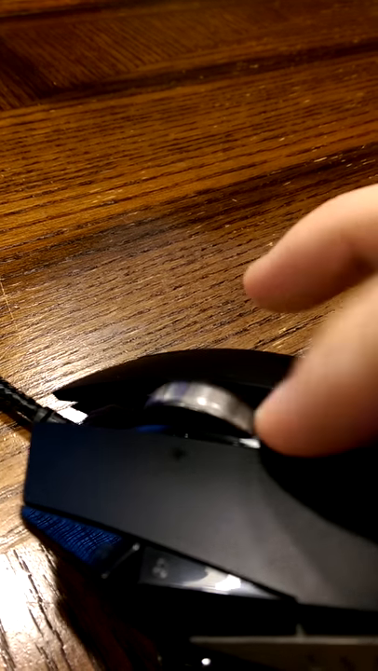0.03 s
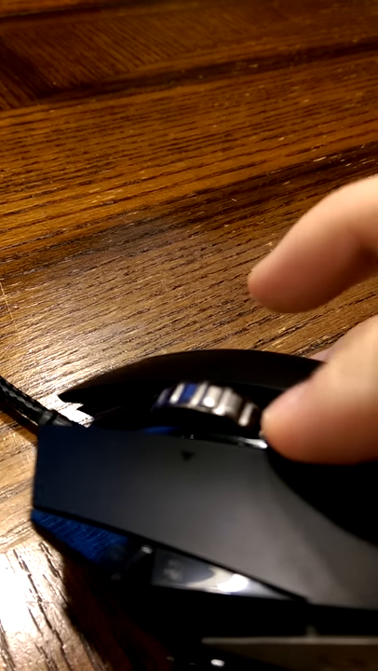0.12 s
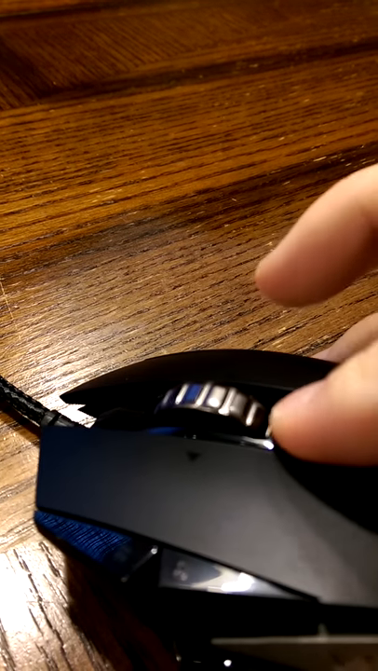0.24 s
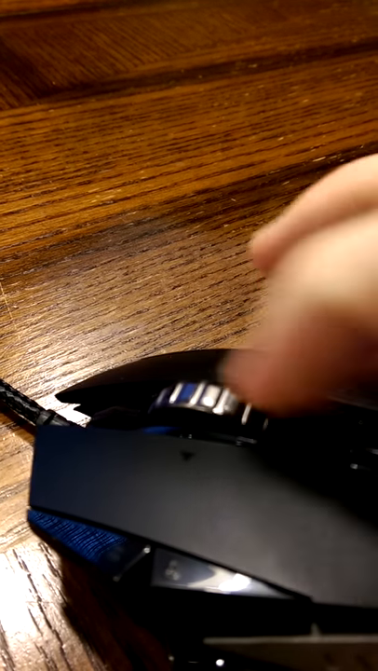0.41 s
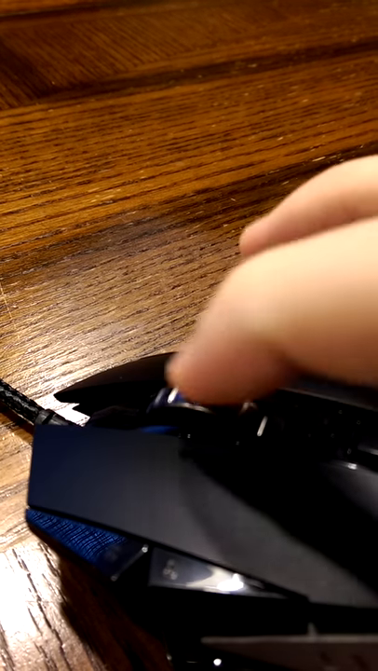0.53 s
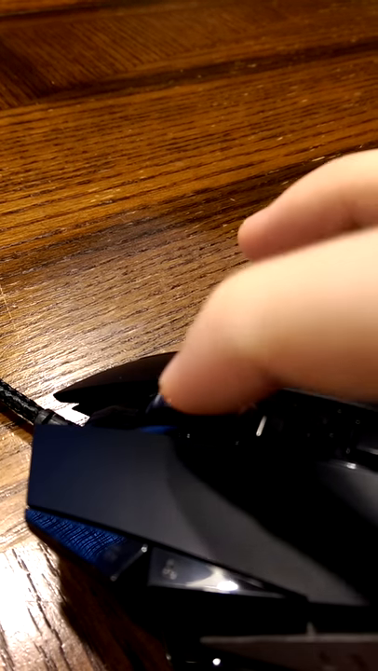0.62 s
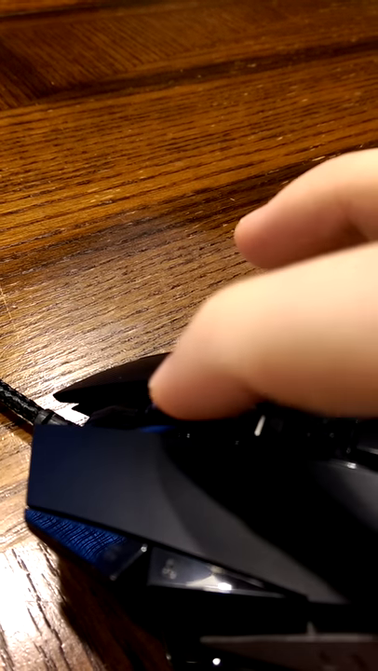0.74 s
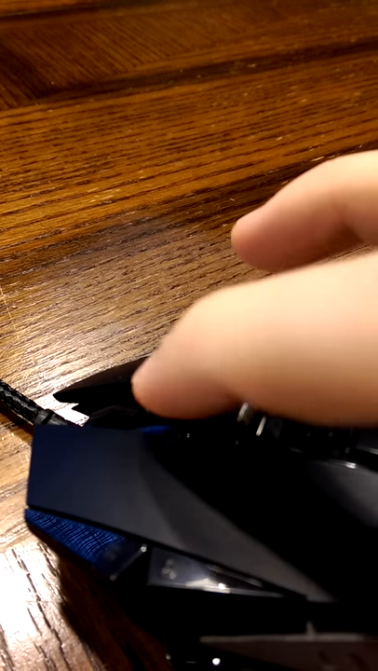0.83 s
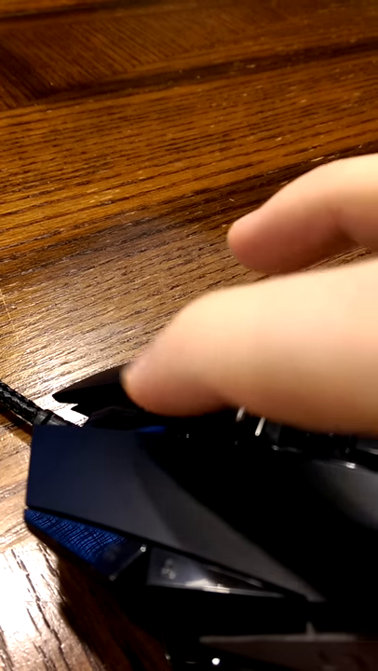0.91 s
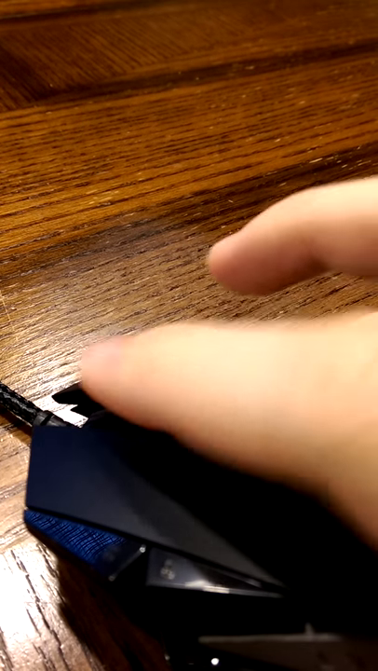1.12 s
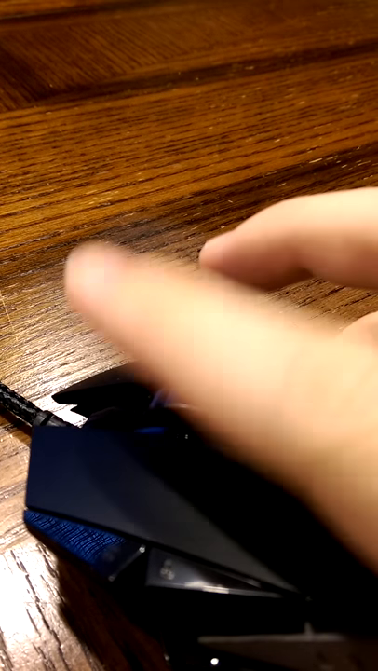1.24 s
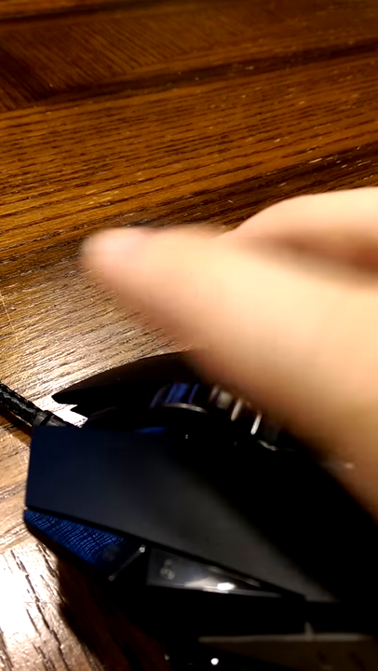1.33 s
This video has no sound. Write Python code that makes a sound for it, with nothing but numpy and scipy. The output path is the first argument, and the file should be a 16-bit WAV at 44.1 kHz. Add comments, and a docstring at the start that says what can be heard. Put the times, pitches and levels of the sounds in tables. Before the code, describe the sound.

A computer mouse button clicks: tiny plastic creaks from 0.11 seconds, a loud sharp snap down at 0.22, and a brighter snap back at 0.42, each with a low desk thump and short room tail. Near quiet follows. Faint, scratchy wheel notches tick around 0.9, 1.09, 1.16 and 1.2-1.25, with soft finger rubbing. Close, left-leaning and duller right, over faint steady room tone.

```python
"""A computer mouse on a wooden desk, close to a phone: a button behind the wheel creaks, snaps down and snaps back.
Then the finger rolls the wheel over a few notches: the pawl scrapes over a tooth and knocks the plastic shell.
Short rough contacts excite ringing modes of button and shell; thumps hum on in the desk; a small room answers.
The right microphone is turned away and hears little treble. Steady room tone lies under it all."""
import sys
import numpy as np
from scipy import signal
from scipy.fft import rfft, irfft
from scipy.io import wavfile
from scipy.ndimage import uniform_filter1d, minimum_filter1d

SR = 44100
rng = np.random.default_rng(int(sys.argv[2]) if len(sys.argv) > 2 else 0)


def transcribe(signal):
    """Save signal, clipped to [-1, 1], as a 16-bit WAV file at the path in sys.argv[1]."""
    frames = np.atleast_2d(signal).T
    limited = np.clip(frames, -1, 1)
    pcm = np.round(limited * 32767).astype(np.int16)
    wavfile.write(sys.argv[1], SR, pcm)


N = 59535
T = np.arange(N) / SR
REF_S = 0.005  # levels of short sounds are their energy spread over this time

# Button snaps, down then up, level before the low cut:
# [t/s, level/dB, contact length/s, desk thump level/dB, place of the load: 0 heel to 1 nose of the mouse]
SNAPS = [(0.2167, -14, 0.0021, -33, 0), (0.4204, -12.5, 0.0024, -42, 0.65)]
# Modes of the button: [f/Hz, t60/s, relative energy level going down/dB, the same coming up/dB]
BUTTON_MODES = [(1150, 0.016, -18.5, -4), (1470, 0.02, -23.5, -6), (1726, .012, -20, -6),
                (2360, 0.012, -8.5, -7.5), (3010, 0.024, -8.5, -5.5), (3490, .01, -3.5, -18.5),
                (4954, 0.013, 1.5, 1), (6240, 0.0084, -10.5, 2), (7260, 0.01094, 0, 3),
                (7740, 0.018, -2.5, -7.5), (9500, .011, -10.5, 0.5), (10750, .009, -1, 6.5),
                (11450, .008, -13.5, 7), (12840, 0.0063, -7, -1.5)]
# Colour of the broad crack of a snap: [f/Hz, relative level/dB]
CRACK_COLOUR = [(100, -23.5), (720, -22.5), (1050, 5.5), (2100, 5.5), (2800, -10), (5000, 2.5), (9000, 4.5),
                (13000, 5), (16000, -14.5)]
CRACK_DB, CRACK_S = -6, 0.0046  # level against the snap, contact length
BUTTON_LOW_HZ = 950  # so small a part radiates little below this

# Scrapes of a spring catch over plastic: [t/s, level/dB, length/s, treble tilt/(dB per octave)]
SCRAPES = [(0.1405, -41.5, 0.013, 5), (0.159, -46, 0.018, -0.5), (0.184, -45, 0.007, 11),
           (0.202, -43.5, 0.012, -3.5), (0.8952, -39.5, 0.0052, -3), (1.0858, -38.5, 0.009, -1),
           (1.156, -40.5, 0.0052, 0.5), (1.2, -40, 0.0079, 3.5), (1.2447, -48.5, 0.0075, 2)]
# Colour of a scrape: [f/Hz, relative level/dB]
SCRAPE_COLOUR = [(300, -16.5), (2000, -12), (4400, -10), (5100, 0.5), (5900, -2), (6400, -1), (7700, -1),
                 (8800, -11), (10700, -12.5), (12000, -19.5), (15500, -24)]
GRAIN_DB, GRAIN_S = 4, 0.00053  # a scrape sticks and slips: scatter of its strength, length of one slip
# Knocks of the mechanism in the shell:
# [t/s, level/dB, contact length/s, treble tilt/(dB per octave), desk thump level/dB, place of the load 0-1]
KNOCKS = [(0.02, -56, 0.03, -2.5, -85, 0.2), (0.113, -54, 0.0084, -3, -70.5, 0.3),
          (0.1459, -40, 0.0034, 0, -64, 0.4), (0.1556, -43.5, 0.0029, 3, -44, 0.63),
          (0.187, -42.5, 0.0011, -2.5, -89, .5), (0.1924, -41, 0.0035, 3.5, -43, 1),
          (0.2097, -41, 0.0038, -5, -68, 0.7), (0.2122, -39, 0.012, 3.5, -60, .5),
          (0.2186, -25.5, 0.002, 6, -47, 0.45), (0.378, -56, 0.0033, 1, -47.5, .3),
          (0.8892, -48, 0.0043, -0.5, -53.5, 0.13), (0.8989, -36, 0.0019, 1, -43.5, 0.77),
          (0.909, -46.5, 0.0047, -2, -48.5, 0.13), (0.9192, -47.5, 0.0029, -3, -42, 0.35),
          (0.993, -57, 0.0064, -0.5, -46, 0.37), (1.081, -51, 0.0036, 4.5, -55, 0.4),
          (1.086, -45, 0.0078, -4, -59, 0.7), (1.094, -44, 0.013, 0.5, -33, 0.3),
          (1.151, -48.5, 0.0036, 1, -58, 0.65), (1.159, -46.5, 0.0032, -1.5, -52, .9),
          (1.1643, -51.5, 0.0023, -2, -36.5, 0.83), (1.1919, -44, 0.0042, -7.5, -59, .9),
          (1.2005, -41.5, 0.0018, 1.5, -63, .9), (1.2221, -43, 0.0038, -1, -38, 1),
          (1.2538, -53.5, 0.0028, -5, -48.5, 0.36)]
# Modes of the shell: [f/Hz, t60/s, relative energy level/dB]
SHELL_MODES = [(933, 0.035, -1.5), (1223, 0.016, 3.5), (1490, 0.013, -8), (2180, 0.022, 0),
               (2710, 0.0062, -0.5), (3110, .016, -10), (3860, 0.028, -7), (5280, 0.011, -4),
               (5860, 0.019, -6.5)]
# Colour of the loose rattle with a knock: [f/Hz, relative level/dB]
RATTLE_COLOUR = [(30, -21.5), (100, -11.5), (300, -6.5), (700, -6), (1200, 0), (2600, -2), (4200, -13),
                 (7500, -20), (11000, -31.5), (16000, -39)]
RATTLE_DB, RATTLE_S = 1.5, 0.014  # level against the knock, contact length
RATTLE_FROM_DB = -54  # lighter taps only ring the shell
RATTLE_MAX_DB = -37.5  # the loose parts have little play: their rattle grows no louder than this

# Soft rubbing of the fingertip on the wheel: [t of the peak/s, length/s, level/dB]
RUBS = [(1.078, .012, -62), (1.15, 0.04, -60), (1.198, 0.021, -51.5), (1.242, 0.016, -54)]
# Colour of the rubbing: [f/Hz, relative level/dB]
RUB_COLOUR = [(300, 13), (3000, 11), (6000, 7), (7700, 12), (9500, -15), (16000, -35)]

# Modes of the desk: [f/Hz, t60/s, relative level loaded at the heel/dB, the same loaded at the nose/dB]
DESK_MODES = [(170.5, 0.35, -10, -4.5), (205, 0.33, -19, -21.5), (259.3, 0.52, -10, -11),
              (271.9, 0.49, -18.5, 2), (291.3, 0.29, -8, -9), (332.5, 0.32, -2, -11.5),
              (390.8, 0.055, -15, -5.5), (484.4, .2, -26, -18), (548, 0.3, -24.5, -20)]
SWELL_S = 0.011  # time scale on which the hum builds up
# Colour of the dull thud of a thump: [f/Hz, relative level/dB]
THUD_COLOUR = [(30, -22), (80, -9.5), (220, 6), (450, -6), (800, -8.5), (2000, -37.5), (16000, -76.5)]
THUD_DB, THUD_S = -6, 0.0052  # level against the hum, contact length

# Loss of direct sound at the right microphone: [f/Hz, level/dB]
DIRECT_SHADOW = [(100, -13), (300, -1.5), (700, -7), (1200, -1), (2300, -15.5), (4500, -25), (8000, -29.5),
                 (14000, -46)]
# Loss of the room's answer at the right microphone: [f/Hz, level/dB]
ROOM_SHADOW = [(100, -10.5), (1200, -2.5), (2300, -2), (4500, -8.5), (8000, -21), (14000, -22)]

# Colour of the room's answer: [f/Hz, level/dB]
ROOM_COLOUR = [(100, 1.5), (300, 6.5), (480, 12.5), (800, 10.5), (1200, 2.5), (2300, -1.5), (3500, -2),
               (5000, -3.5), (8000, 0.5), (11500, -3), (15000, -15.5)]
ECHO_DB, ECHO_DELAY_S, ECHO_S = -16, 0.009, 0.005  # early reflections before colour: level, first arrival, spread
ROOM_DB, ROOM_DELAY_S = -17, 0.0064  # diffuse tail before colour: level, first arrival
ROOM_T60_S, TREBLE_T60_S, TREBLE_HZ = 0.46, 0.35, 7300  # decay below and above TREBLE_HZ
# what goes into the room, against what goes straight to the phone
RING_SEND_DB, CRACK_SEND_DB, HUM_SEND_DB = -0.5, 3, -4.5

# Colour of the steady room tone: [f/Hz, relative level/(dB per Hz)]
TONE_COLOUR = [(25, -7), (100, -0.5), (200, -4.5), (320, 0.5), (550, -3), (900, -13), (2000, -16),
               (5000, -19.5), (12000, -22.5), (16000, -22)]
TONE_LEFT_DB, TONE_RIGHT_DB = -61.5, -64.5
TONE_SHARED_HZ = 491.5  # below this both microphones hear the same room tone

CEILING, LIMIT_S = 0.9, 0.001  # limiter: peak amplitude, window
TOP_HZ = 16000  # upper edge of the phone's sound


def button():
    """Each snap rings the button's modes, with a broad crack on top; returns ring and crack."""
    rings, cracks = np.zeros(N), np.zeros(N)
    for k, (s, db, length, *_) in enumerate(SNAPS):
        modes = [(m[0], m[1], m[2 + k]) for m in BUTTON_MODES]  # down first, then up
        body = ring(modes, 0.05)
        add(rings, s, unit(conv(contact(length), body)), db)
        add(cracks, s, unit(colour(contact(CRACK_S), CRACK_COLOUR)), db + CRACK_DB)
    low_cut = signal.butter(4, BUTTON_LOW_HZ, "high", fs=SR, output="sos")
    return signal.sosfilt(low_cut, [rings, cracks])


def ratchet():
    """Grainy scrapes of the catch, and knocks that ring the shell; the firmer ones rattle it too."""
    out = np.zeros(N)
    shell = ring(SHELL_MODES, 0.06)
    for s, db, length, slope_db in SCRAPES:
        scrape = colour(stick_slip(length), SCRAPE_COLOUR)
        add(out, s, unit(tilt(scrape, slope_db)), db)
    for s, db, length, slope_db, *_ in KNOCKS:
        knock = conv(contact(length), shell)
        add(out, s, unit(tilt(knock, slope_db)), db)
        if db > RATTLE_FROM_DB:
            rattle = colour(contact(RATTLE_S), RATTLE_COLOUR)
            add(out, s, unit(tilt(rattle, slope_db)), min(db + RATTLE_DB, RATTLE_MAX_DB))
    return out


def stick_slip(length, size=2048):
    """A sliding contact that catches and lets go unevenly."""
    slips = rng.standard_normal(size)
    strength = np.interp(T[:size] / GRAIN_S, np.arange(size), slips)
    return contact(length) * undb(GRAIN_DB * strength)


def fingertip():
    """Skin rubs faintly on the wheel: coloured noise that swells and fades smoothly."""
    strength = sum(undb(db) * np.exp(-2 * ((T - s) / length) ** 2) for s, length, db in RUBS)
    return hiss(RUB_COLOUR) * strength


def desk():
    """Snaps and knocks thud on the desk top, which hums on; the place of the load shifts its mode balance."""
    out = np.zeros(N)
    for s, *_, db, place in list(SNAPS) + list(KNOCKS):
        modes = [(hz, t60, np.interp(place, [0, 1], [heel_db, nose_db]))
                 for hz, t60, heel_db, nose_db in DESK_MODES]
        add(out, s, ring(modes, 0.5, SWELL_S), db)
        add(out, s, unit(colour(contact(THUD_S), THUD_COLOUR)), db + THUD_DB)
    return out


def room(x):
    """A cluster of early reflections and a short diffuse tail whose treble dies first."""
    early = rng.standard_normal(N) * ((T > ECHO_DELAY_S) & (T < ECHO_DELAY_S + ECHO_S))
    tail = np.zeros(N)
    for kind, t60 in (("low", ROOM_T60_S), ("high", TREBLE_T60_S)):
        band = signal.butter(2, TREBLE_HZ, kind, fs=SR, output="sos")
        tail += signal.sosfilt(band, rng.standard_normal(N)) * np.exp(-np.log(1000) * T / t60)
    tail *= T > ROOM_DELAY_S
    response = undb(ECHO_DB) * unit(early) + undb(ROOM_DB) * unit(tail)
    return colour(conv(x, response), ROOM_COLOUR)


def room_tone():
    """Steady air of the room: the bass is shared by both microphones, the treble is not."""
    left, other = hiss(TONE_COLOUR), hiss(TONE_COLOUR)
    low = signal.butter(2, TONE_SHARED_HZ, "low", fs=SR, output="sos")
    high = signal.butter(2, TONE_SHARED_HZ, "high", fs=SR, output="sos")
    right = signal.sosfiltfilt(low, left) + signal.sosfilt(high, other)
    return np.array([undb(TONE_LEFT_DB) * left, undb(TONE_RIGHT_DB) * right])


def contact(length, size=2048):
    """A brief rough contact: a flurry of tiny impacts with an even spectrum."""
    u = T[:size] / max(length, 1 / SR)
    env = (1 - np.exp(-20 * u)) * np.exp(-2 * u ** 2)
    x = rng.standard_normal(size) * env
    for _ in range(4):  # flatten the spectrum, then shape in time again
        z = rfft(x)
        x = irfft(z / (abs(z) + 1e-12)) * np.sqrt(env)
    return unit(x)


def ring(modes, length, swell=1e-5):
    """Response of decaying (f/Hz, t60/s, energy/dB) modes that build up on a time scale of `swell` seconds."""
    t = T[:int(length * SR)]
    rise = 1 - np.exp(-(t / swell) ** 2)
    out = np.zeros(len(t))
    for k, (hz, t60, db) in enumerate(modes):
        mode = rise * np.sin(2 * np.pi * hz * t) * np.exp(-np.log(1000) * t / t60)
        out += (-1) ** k * undb(db) * unit(mode)  # neighbours in opposite polarity
    return unit(out)


def hiss(points):
    """Steady coloured noise of rms one."""
    x = colour(rng.standard_normal(N), points)
    return x / np.std(x)


def colour(x, points, size=2048):
    """Causal minimum-phase filter through (f/Hz, level/dB) points."""
    hz, db = np.array(points).T
    f = np.maximum(np.arange(size // 2 + 1) * SR / size, 1)
    cep = irfft(np.log(undb(np.interp(np.log(f), np.log(hz), db))))
    cep[1:size // 2] *= 2  # fold the cepstrum onto positive time
    cep[size // 2 + 1:] = 0
    return conv(x, irfft(np.exp(rfft(cep))))


def tilt(x, db):
    """Slope the four octaves above 1 kHz by so many dB each."""
    return colour(x, [(1000, 0), (16000, 4 * db)])


def conv(x, h):
    """Pass a sound through a response."""
    return signal.fftconvolve(x, h)[:N]


def add(track, s, x, db):
    """Place a short sound of unit energy on a track at a time and level."""
    i = max(int(s * SR), 0)
    x = x[:max(N - i, 0)]
    track[i:i + len(x)] += x * undb(db) * np.sqrt(REF_S * SR)


def unit(x):
    """Scale to an energy of one."""
    return x / np.sqrt(np.sum(x ** 2) + 1e-20)


def undb(db):
    """Decibels to gain."""
    return 10 ** (np.asarray(db) / 20)


def scene():
    """The mouse and desk in the room, at the near and the shaded microphone."""
    rings, cracks = button()
    wheel = ratchet() + fingertip()
    hum = desk()
    direct = wheel + hum + rings + cracks
    sent = wheel + undb(HUM_SEND_DB) * hum + undb(RING_SEND_DB) * rings + undb(CRACK_SEND_DB) * cracks
    # each microphone gets its own draw of the room
    left = direct + room(sent)
    right = colour(direct, DIRECT_SHADOW) + colour(room(sent), ROOM_SHADOW)
    return np.array([left, right]) + room_tone()


def record(dry):
    """The phone's fast limiter holds the peaks under full scale; the top is cut."""
    size = int(LIMIT_S * SR)
    needed_gain = CEILING / np.maximum(abs(dry), CEILING)
    gain = uniform_filter1d(minimum_filter1d(needed_gain, size), size)
    top_cut = signal.butter(10, TOP_HZ, fs=SR, output="sos")
    return signal.sosfiltfilt(top_cut, dry * gain)


dry = scene()
out = record(dry)
transcribe(out)
```